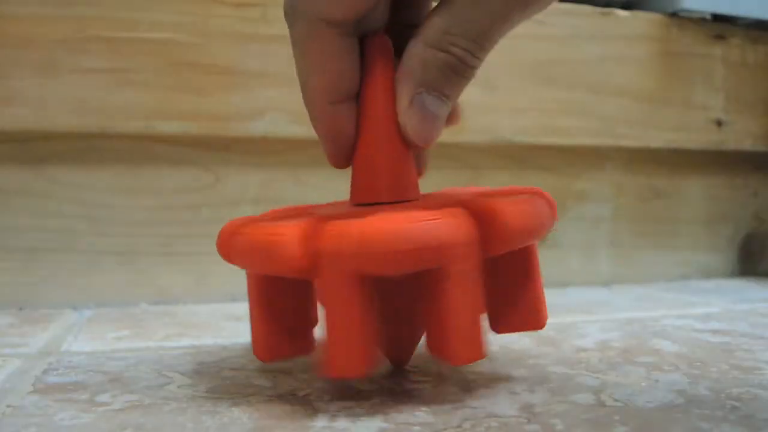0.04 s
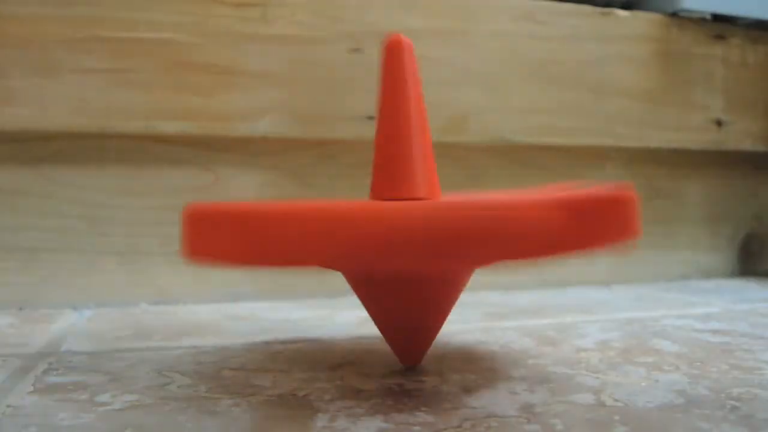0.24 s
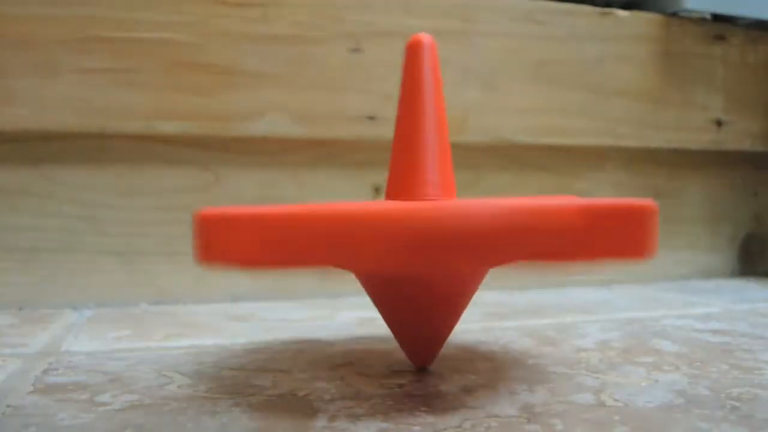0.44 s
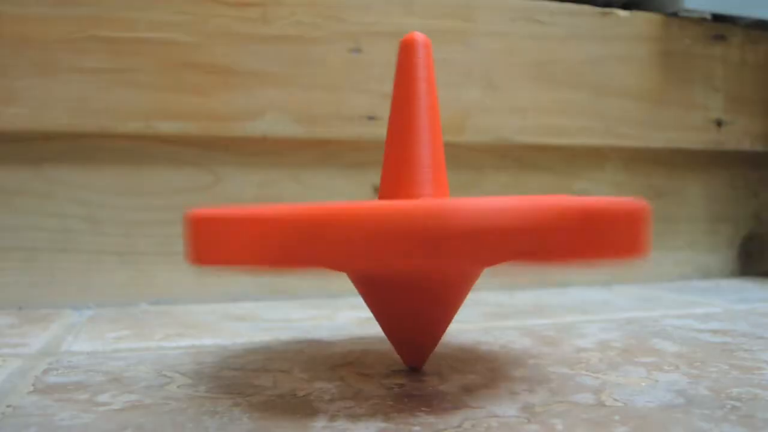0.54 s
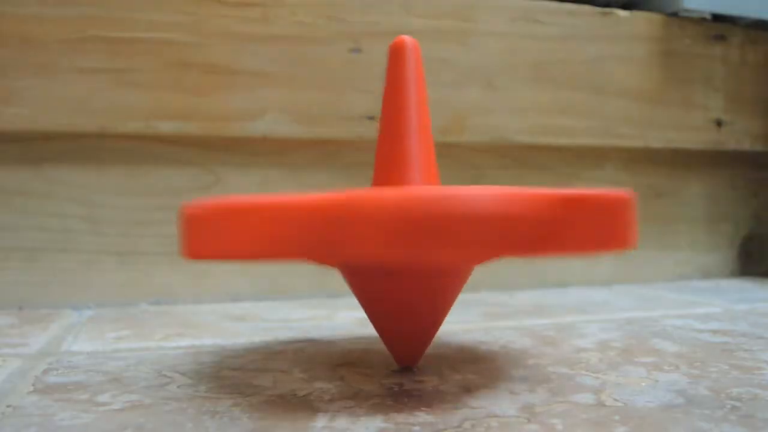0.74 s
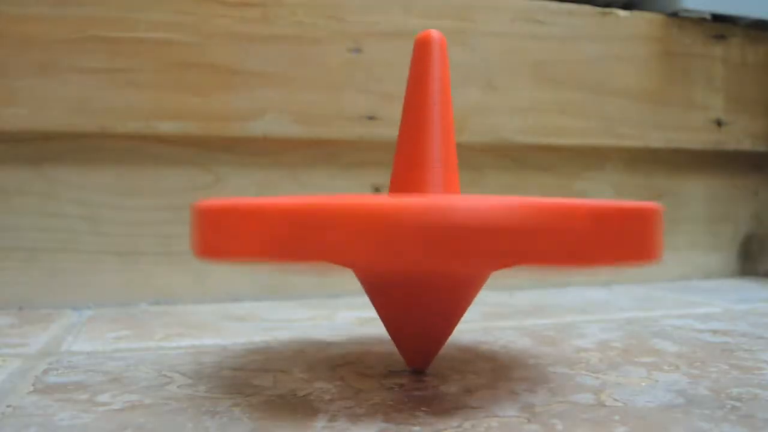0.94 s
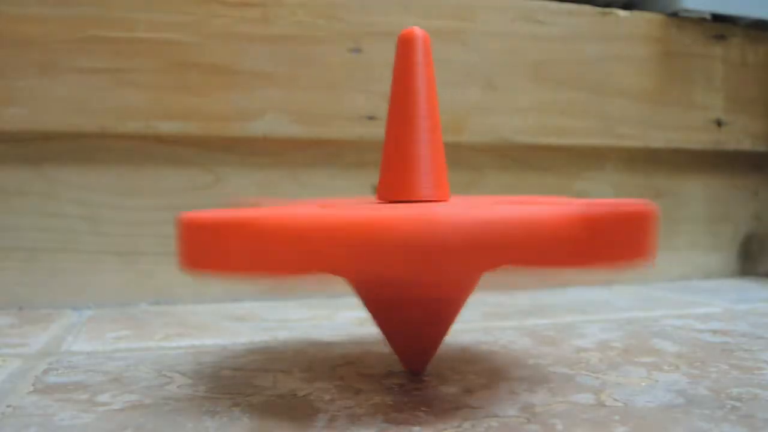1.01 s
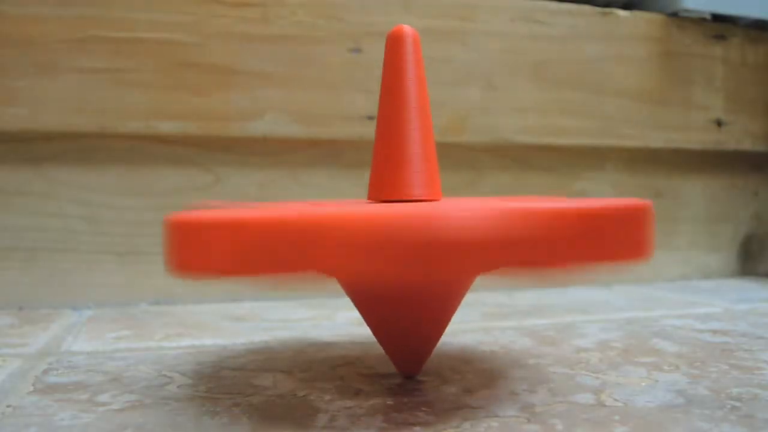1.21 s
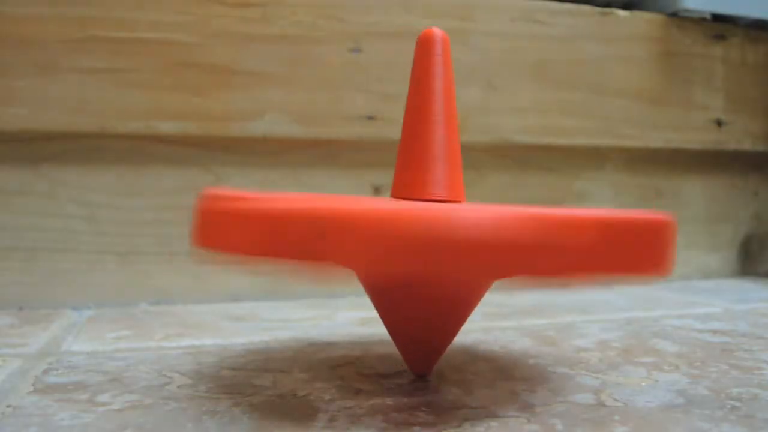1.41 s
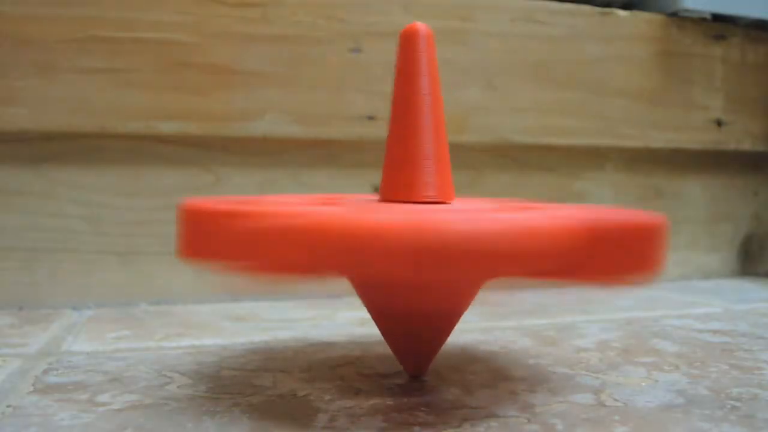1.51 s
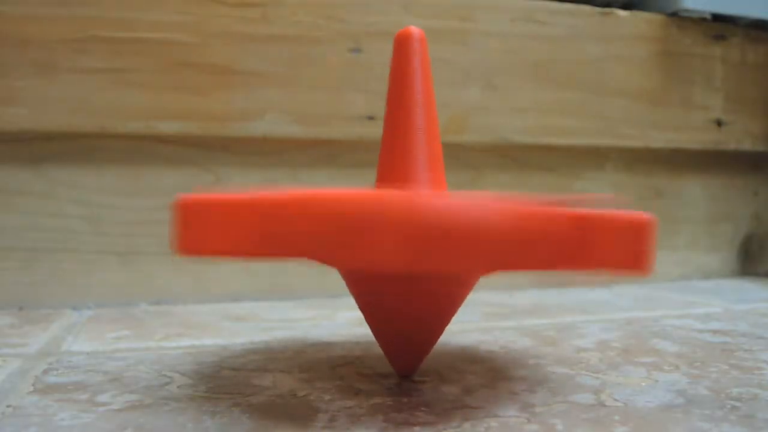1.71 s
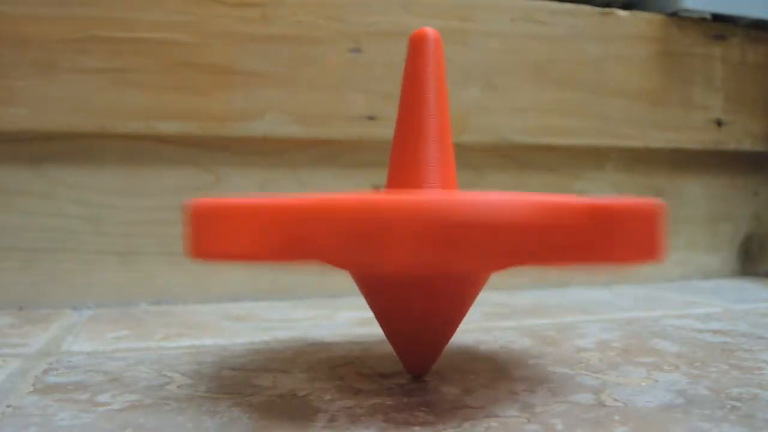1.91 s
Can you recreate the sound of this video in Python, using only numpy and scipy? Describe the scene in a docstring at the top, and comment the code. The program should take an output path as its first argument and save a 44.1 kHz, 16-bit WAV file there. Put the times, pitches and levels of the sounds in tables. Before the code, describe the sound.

A plastic top spun on tile with a scrape and clack, then faint rubbing and ticking.

```python
"""A plastic top with hinged arms is spun on a tile floor, close by, in a small room with a faint hum.
First fingers rub the stem. The hinges snap free and creak, and the plastic scrapes and squeaks in quick
surges as the top is twisted and let go. The arms fly out and clack against their stops. Then the tip
rubs round on the tile in soft swells, ticking and bumping over its grain. The top wobbles with low
knocks and skids with a few tiny squeaks; a little later a faint hollow ring swells once."""
import sys
import numpy as np
from scipy import signal
from scipy.fft import rfft, irfft, next_fast_len
from scipy.io import wavfile
from scipy.ndimage import uniform_filter1d, minimum_filter1d

SR = 44100
rng = np.random.default_rng(int(sys.argv[2]) if len(sys.argv) > 2 else 0)


def store_wav(level_fs):
    """Save 16-bit WAV to argv[1]."""
    pcm = np.round(np.clip(np.atleast_2d(level_fs), -1, 1) * 32767)
    wavfile.write(sys.argv[1], SR, pcm.T.astype(np.int16))


N = 85995
T = np.arange(N) / SR
FFT_SIZE = 2 * next_fast_len(N)
HZ = np.maximum(np.arange(FFT_SIZE // 2 + 1) * SR / FFT_SIZE, 1)

# tone of the room's air and of its echoes (frequency [Hz], level [dB])
AIR_TONE = [(20, -15.5), (90, 0), (180, -4), (450, -12), (800, -11), (1500, -14.5), (9000, -15),
            (14000, -19)]
ECHO_TONE = [(100, 5), (400, 3), (1300, 2.5), (2300, -10), (3300, -0.5), (14000, -11)]
# notes of a steady whirr and of a hollow ring (frequency [Hz], width [Hz], level [dB])
WHIRR_NOTES = [(535, 27, 0)]
HOLLOW_NOTES = [(550, 23, 3.5), (690, 72, -14)]
# the one swell of the hollow ring (peak time [s], rise [s], fall [s], level [dB])
HOLLOW_SWELL = [(1.32, 0.16, 0.1, -68)]
# how much louder the left is than the right (frequency [Hz], level [dB])
LEFT_OVER_RIGHT = [(100, -2.5), (2400, -2.4), (5000, -1.5), (7000, 0), (9000, 5), (11500, 0), (14000, -2)]
# stereo width, side against middle, as the turning faces reach each side unalike
# (frequency [Hz], level [dB])
STEREO_WIDTH = [(1200, -18.5), (2500, -14), (5000, -8.5), (12000, -6.5)]

# tone of the tile when rolled on and when struck (frequency [Hz], level [dB])
TILE_ROLL_TONE = [(40, -29), (150, -4), (320, 0), (450, 0.5), (900, -8), (1500, -18), (3000, -13),
                  (8000, -55)]
TILE_THUD_TONE = [(40, -32.5), (110, -5), (170, 1.5), (260, 2), (400, 3.5), (900, 1.5), (1700, -8),
                  (2400, -13), (4200, -26)]
# the top pressing into the floor (time [s], pitch [Hz], level [dB])
FLOOR_KNOCKS = [(0.24, 41.8, -48.5), (.552, 303, -60.5), (.652, 291, -60), (1.021, 333, -61),
                (1.419, 298, -62.5)]
# the tip rubbing on the tile (peak time [s], rise [s], fall [s], hiss [dB], rumble [dB])
TIP_RUBS = [(0.441, 0.15, 0.029, -60, -61.5), (.562, 0.031, 0.022, -60.5, -71),
            (.677, 0.029, 0.019, -57, -64.5), (0.779, 0.033, 0.032, -60, -68.5),
            (0.911, 0.02, 0.019, -56, -64.5), (1.024, 0.021, 0.024, -56, -67.5),
            (1.149, 0.016, 0.021, -57.5, -62), (1.236, 0.021, 0.017, -63.5, -69),
            (1.303, 0.013, 0.0063, -65, -80), (1.403, 0.033, 0.025, -65.5, -75),
            (1.553, 0.038, 0.023, -62, -74.5), (1.69, 0.022, 0.03, -58.5, -72.5),
            (1.795, 0.017, 0.0064, -66.5, -79), (1.845, 0.0047, 0.012, -62.5, -76.5),
            (1.936, 0.048, .025, -67, -80.5)]
# the tip catching on the tile's grain (time [s], tick [dB], thud [dB])
TIP_TICKS = [(0.451, -54.5, -71), (0.485, -61, -79), (0.5076, -56, -73), (0.679, -56.5, -60.5),
             (0.745, -71, -62), (0.909, -50, -54.5), (0.9106, -57, -71), (0.9174, -64, -58),
             (.924, -72, -55.5), (0.929, -68, -53.5), (.935, -58, -49.5), (0.9407, -57.5, -50),
             (0.9903, -56.5, -85), (1.026, -58.5, -87), (1.135, -53.5, -60.5), (1.166, -54.5, -56),
             (1.395, -53, -81), (1.42, -60.5, -62), (1.67, -54, -81)]
# plastic sticking and slipping (peak time [s], rise [s], fall [s], pitch [Hz], level [dB])
PLASTIC_SQUEAKS = [(.2515, 0.0044, 0.008, 2347, -24), (0.316, 0.0027, .002, 2386, -24.5),
                   (.912, .002, 0.0055, 3102, -58), (.926, 0.0014, 0.0026, 3160, -52),
                   (0.9363, 0.0013, 0.0024, 3120, -54.5)]
# hinges creaking, fingers rubbing, plastic scraping (peak time [s], rise [s], fall [s], level [dB])
HINGE_CREAKS = [(.195, .003, .003, -43), (.2235, .003, .003, -39)]
FINGER_RUBS = [(.076, .0015, 0.003, -59), (.100, 0.0011, .016, -60), (.138, .002, .007, -61),
               (.165, .002, .014, -59)]
TWIST_SCRAPES = [(.204, 0.0089, 0.015, -45), (.248, 0.012, 0.0096, -19), (.282, 0.0048, 0.0073, -20.5),
                 (.310, 0.0056, 0.0068, -23), (.3165, 0.0081, 0.0016, -23.5), (.340, 0.022, 0.022, -38),
                 (.372, 0.0089, 0.021, -41.5)]
# the hinges snapping free as the arms start to lift (time [s], level [dB])
HINGE_SNAPS = [(.1853, -41), (.1988, -33.5)]
# sharp plastic clacks: one as the hinges snap free, two as the arms hit their stops
# (time [s], clack [dB], thud [dB])
PLASTIC_CLACKS = [(0.186, -41, -65), (0.3517, -18.5, -35.5), (0.3756, -31.5, -53.5)]
# tone of the rubbing tip, the stem, the scrapes and the clacks (frequency [Hz], level [dB])
TIP_TONE = [(100, -17), (1500, -34), (2600, -33), (4000, -37.5), (4800, -18), (8000, -12), (12000, -12),
            (14000, -20.5)]
STEM_TONE = [(100, -34), (700, -8), (1900, -9.5), (4000, -33.5), (8000, -13), (14000, -21.5)]
SCRAPE_TONE = [(60, -36), (300, -30), (550, -26.5), (1200, -18.5), (2600, -26), (4000, -14.5),
               (5200, -12.5), (6400, -17.5), (7400, -10.5), (9500, -13.5), (14000, -23.5)]
CLACK_TONE = [(60, -45.5), (300, -36.5), (700, -13), (1200, -6.5), (3200, -21.5), (4300, -17),
              (6400, -15.5), (7200, -7.5), (8500, -7.5), (10500, -16.5), (14000, -25)]
# notes the top rings at from its tip, hinges, stem and shell (frequency [Hz], width [Hz], level [dB])
TIP_NOTES = [(3130, 51, 0.5), (3440, 79, -4), (5434, 110, 3), (7117, 230, -1.5), (8360, 214, -3),
             (9460, 200, -5), (10930, 250, -7.5)]
HINGE_NOTES = [(1874, 59, 3.5), (2370, 70, -3), (2760, 31, -1), (3313, 100, -1), (3480, 280, -6),
               (9630, 4100, -17.5)]
STEM_NOTES = [(2250, 160, 6.5)]
SHELL_NOTES = [(1190, 98, -9), (1390, 76, -8.5), (1849, 50, -2), (2338, 160, 0.5), (2560, 80, -5.5),
               (3102, 210, -3.5), (3300, 41, -20.5), (3530, 50, -3.5), (7220, 140, -15), (8460, 270, -10.5),
               (12270, 250, -12)]

SCRAPE_SLIPS_PER_S, SCRAPE_SPREAD_DB = 9000, 3
TICK_RISE_S = 0.00015
HIT_WINDOW_S = .005  # a hit's level counts its energy as if spread over this time


def undb(db):
    """Turn decibels into a gain."""
    return 10 ** (np.asarray(db) / 20)


def unit(x):
    """Scale a signal to an average power of 1."""
    return x / np.sqrt(np.mean(x ** 2))


def curve(points):
    """Join (frequency, level) points into a gain for every frequency."""
    hz, db = np.array(points, float).T
    return undb(np.interp(np.log(HZ), np.log(hz), db))


def shape(x, gain):
    """Filter a signal with one gain for each frequency."""
    return irfft(rfft(x, FFT_SIZE) * gain, FFT_SIZE)[..., :N]


def body(x, tone=None, notes=()):
    """Let x shake an object with a broad tone and ringing notes; white noise keeps its power."""
    power = curve(tone) ** 2 if tone else 1e-12
    for hz, width, db in notes:
        power = power + undb(db) ** 2 / (1 + ((HZ / hz - hz / HZ) * hz / width) ** 2)
    cepstrum = irfft(np.log(power / np.mean(power)) / 2)
    # fold it so that the ringing comes after each push, never before
    cepstrum[1:FFT_SIZE // 2] *= 2
    cepstrum[FFT_SIZE // 2 + 1:] = 0
    return shape(x, np.exp(rfft(cepstrum)))


def noise():
    """White noise: an even hiss."""
    return rng.standard_normal(N)


def waver(below_hz):
    """A random wiggle with only slow changes in it."""
    return unit(shape(noise(), HZ < below_hz))


def grit(slips_per_s, spread_db):
    """Rubbing is a crowd of tiny slips of uneven size."""
    size = undb(spread_db * np.minimum(rng.exponential(size=N), 5))
    slips = rng.random(N) < slips_per_s / SR
    return unit(slips * size * np.sign(noise()))


def swells(rows):
    """Loudness over time: smooth humps, each with its own rise and fall."""
    power = sum(undb(db) ** 2 * np.exp(-((T - peak) / np.where(T < peak, rise, fall)) ** 2)
                for peak, rise, fall, db in rows)
    return np.sqrt(power)


def chatter(hits, rise_s, fall_s):
    """Each hit buzzes for a few milliseconds."""
    out, slips = np.zeros(N), noise()
    for start, db in hits:
        age = np.maximum(T - start, 0)
        burst = slips * (1 - np.exp(-(age / rise_s) ** 2)) * np.exp(-age / fall_s)
        out += burst * undb(db) * np.sqrt(HIT_WINDOW_S * SR / np.sum(burst ** 2))
    return out


def wide(source):
    """Make a source twice with fresh grain: once for the middle, once for the sides."""
    width = curve(STEREO_WIDTH)
    norm = np.sqrt(1 + width ** 2)
    middle, side = shape(source(), 1 / norm), shape(source(), width / norm)
    return np.array([middle + side, middle - side])


def room_tone(air_db=-71, hum_hz=240, hum_db=-82, whirr_db=-78.5):
    """Soft air noise, partly alike on both sides, a hum, a whirr and a hollow ring that swells once."""
    shared_air = body(noise(), AIR_TONE)
    air = unit(shared_air + np.array([body(noise(), AIR_TONE), body(noise(), AIR_TONE)]))
    hum = np.sqrt(2) * np.sin(2 * np.pi * (hum_hz * T + rng.random()))
    whirr = unit(body(noise(), notes=WHIRR_NOTES))
    hollow = body(noise(), notes=HOLLOW_NOTES) * swells(HOLLOW_SWELL)
    return air * undb(air_db) + hum * undb(hum_db) + whirr * undb(whirr_db) + hollow


def echoes(x, fade_60db_s=.28, build_s=0.0036, widest_hz=4000):
    """The room returns a dying cloud of echoes, widest in the treble."""
    fade = np.exp(-np.log(1000) * T / fade_60db_s)
    build = 1 - np.exp(-(T / build_s) ** 2)
    cloud = rfft(np.array([noise(), noise()]) * fade * build, FFT_SIZE)
    # even it out so that no one note booms
    middle, side = cloud / np.sqrt(uniform_filter1d(np.abs(cloud) ** 2, size=400, axis=1))
    width = np.clip(HZ / widest_hz, 1 / 3, 1)
    left_right = np.array([middle + width * side, middle - width * side]) / np.hypot(1, width)
    return shape(x, left_right * curve(ECHO_TONE))


def knocks(rise_s=0.0068):
    """The top presses into the floor as it is let go and as it wobbles: soft, low knocks."""
    out = np.zeros(N)
    for start, hz, db in FLOOR_KNOCKS:
        age = np.maximum(T - start, 0)
        loudness = undb(db) * age / rise_s * np.exp(1 - age / rise_s)
        out += loudness * np.sin(2 * np.pi * hz * age)
    return out


def thuds(hits, rattle_db=-6, dull_above_hz=3000):
    """Blows pass through the tip into the tile, each with a brief rattle, dulled by the soft contact."""
    rattle = undb(rattle_db)
    blows = rattle * chatter(hits, TICK_RISE_S, fall_s=0.00643)
    for start, db in hits:
        blows[int(start * SR)] += undb(db) * np.sqrt(HIT_WINDOW_S * SR)
    soft_contact = signal.butter(2, dull_above_hz, fs=SR, output="sos")
    return body(signal.sosfilt(soft_contact, blows / np.hypot(1, rattle)), TILE_THUD_TONE)


def tile(flutter):
    """The tile rumbles under the rolling tip and thuds at every clack and tick."""
    rumble = swells([(peak, rise, fall, db) for peak, rise, fall, _, db in TIP_RUBS])
    jolts = [(start, db) for start, _, db in PLASTIC_CLACKS + TIP_TICKS]
    return body(noise() * flutter * rumble, TILE_ROLL_TONE) + thuds(jolts)


def tip(flutter):
    """The tip rubs and catches on the tile, so the top rings with hiss and ticks."""
    hiss = swells([(peak, rise, fall, db) for peak, rise, fall, db, _ in TIP_RUBS])
    rub = grit(slips_per_s=4500, spread_db=2) * flutter * hiss
    ticks = chatter([(start, db) for start, db, _ in TIP_TICKS], TICK_RISE_S, fall_s=0.0032)
    return body(rub + ticks, TIP_TONE, TIP_NOTES)


def squeaks(flutter, pitch_wobble=0.0258):
    """Plastic sticks and slips, in the twist and when the tip skids: short squeaks of unsteady pitch."""
    unsteady_time = np.cumsum(1 + pitch_wobble * waver(below_hz=344)) / SR
    out = np.zeros(N)
    for peak, rise, fall, hz, db in PLASTIC_SQUEAKS:
        out += np.sqrt(2) * np.sin(2 * np.pi * hz * unsteady_time) * swells([(peak, rise, fall, db)])
    return flutter * out


def hinges():
    """The hinges snap free and creak as the arms start to lift."""
    creaks = grit(SCRAPE_SLIPS_PER_S, SCRAPE_SPREAD_DB) * swells(HINGE_CREAKS)
    snaps = chatter(HINGE_SNAPS, rise_s=.0003, fall_s=.003)
    return body(snaps + creaks, notes=HINGE_NOTES)


def clacks():
    """Sharp clacks ring the shell: one as the hinges snap free, two as the arms hit their stops."""
    hits = chatter([(start, db) for start, db, _ in PLASTIC_CLACKS], rise_s=.0008, fall_s=.0036)
    return body(hits, CLACK_TONE, SHELL_NOTES)


def twist():
    """Fingers rub the stem, then the plastic scrapes in surges that ring the shell."""
    fingers = body(noise() * swells(FINGER_RUBS), STEM_TONE, STEM_NOTES)
    scrapes = grit(SCRAPE_SLIPS_PER_S, SCRAPE_SPREAD_DB) * swells(TWIST_SCRAPES)
    return fingers + body(scrapes, SCRAPE_TONE, SHELL_NOTES)


def scene(flutter_db=2.53, echo_db=-14):
    """The top on its tile, in the room; the pressure on the tip flutters."""
    flutter = undb(flutter_db * waver(below_hz=120))
    plastic = wide(lambda: twist() + hinges() + clacks() + tip(flutter))
    top = plastic + squeaks(flutter) + tile(flutter) + knocks()
    in_room = top + undb(echo_db) * echoes(top) + room_tone()
    lean_left = np.sqrt(curve(LEFT_OVER_RIGHT))
    return shape(in_room, np.array([lean_left, 1 / lean_left]))


def record(dry):
    """A fast limiter turns down the loudest peaks, and the highest treble is cut off."""
    ceiling_db, hold_s, cutoff_hz = -16.5, .0015, 14100
    ceiling, hold = undb(ceiling_db), int(hold_s * SR)
    needed_gain = ceiling / np.maximum(np.abs(dry).max(axis=0), ceiling)
    smooth_gain = uniform_filter1d(minimum_filter1d(needed_gain, hold), hold)
    treble_cut = signal.ellip(10, .2, 80, cutoff_hz, fs=SR, output="sos")
    return signal.sosfilt(treble_cut, dry * smooth_gain)


dry = scene()
out = record(dry)
store_wav(out)
```